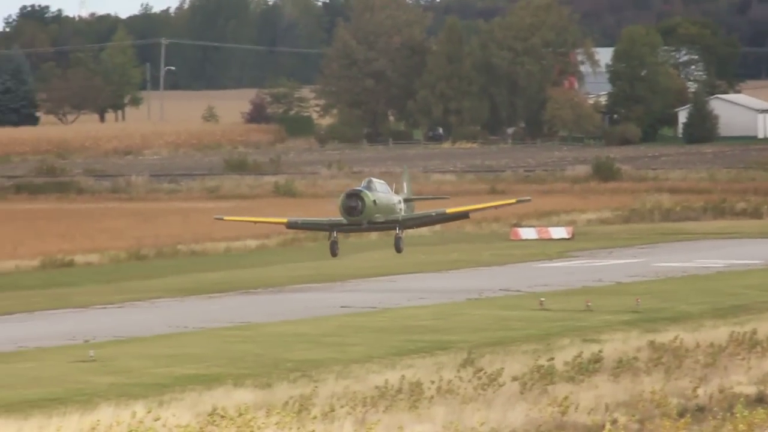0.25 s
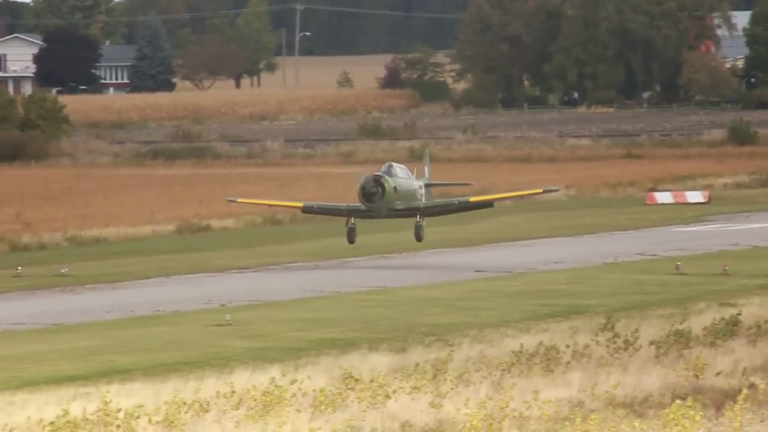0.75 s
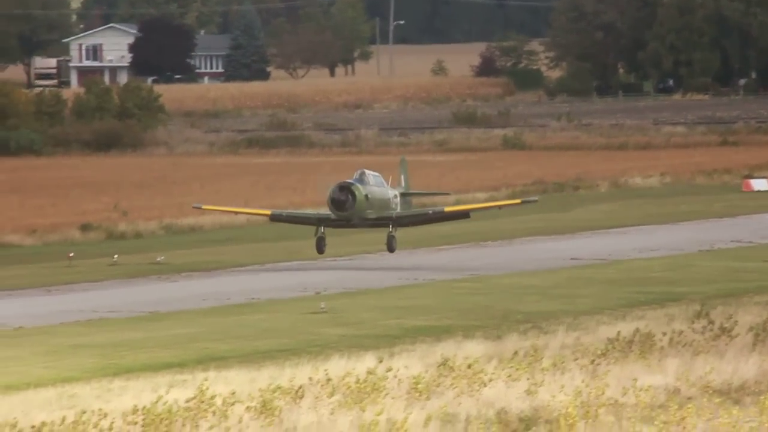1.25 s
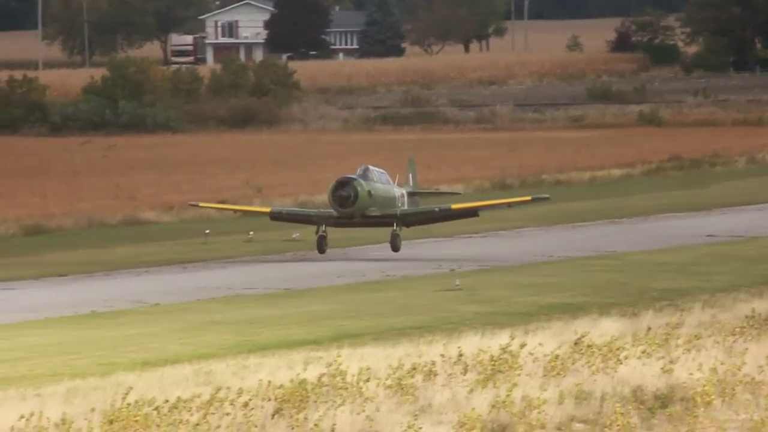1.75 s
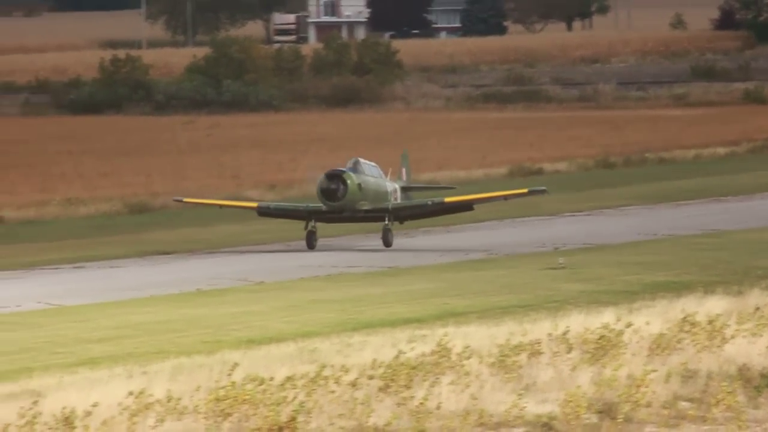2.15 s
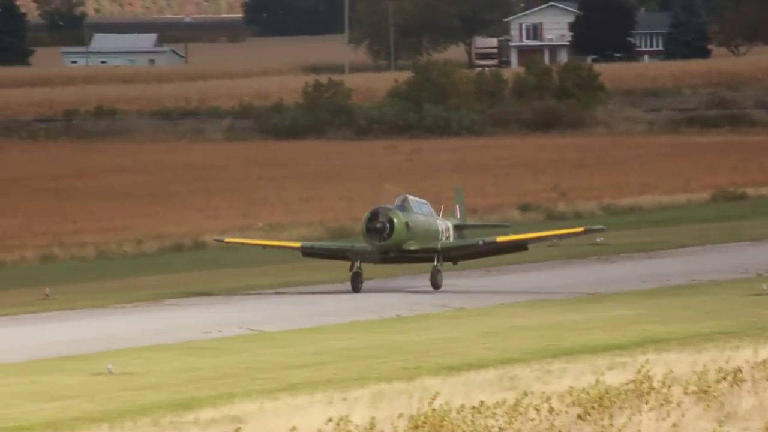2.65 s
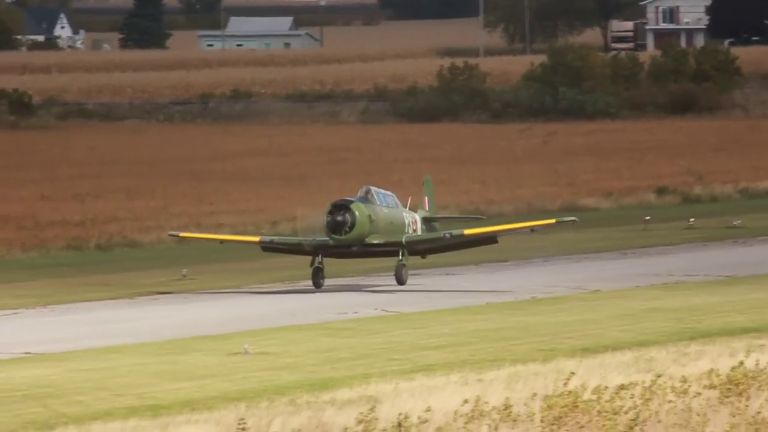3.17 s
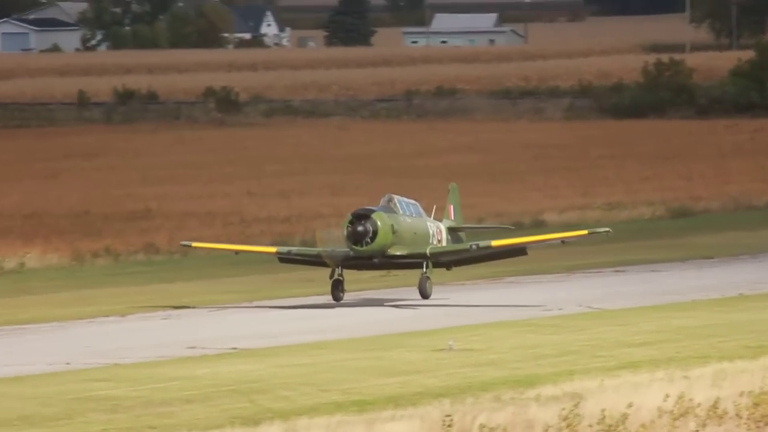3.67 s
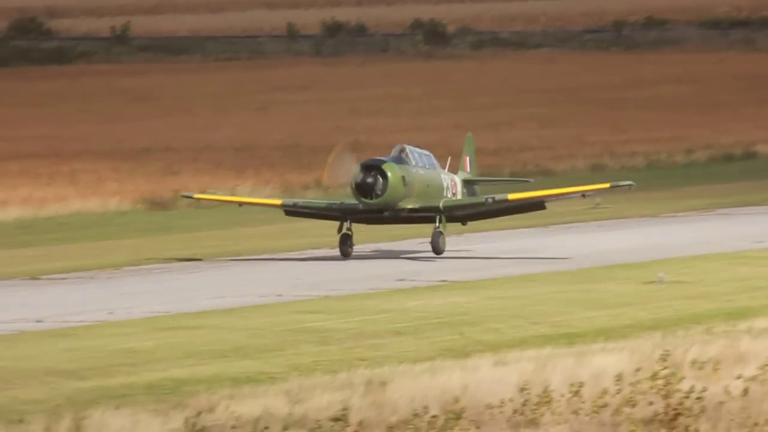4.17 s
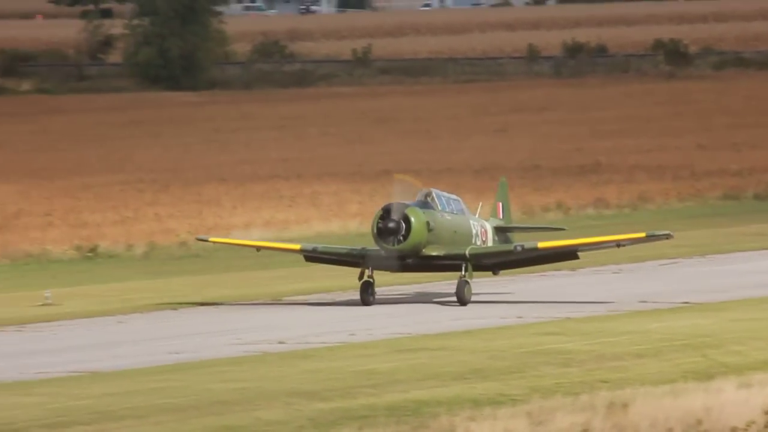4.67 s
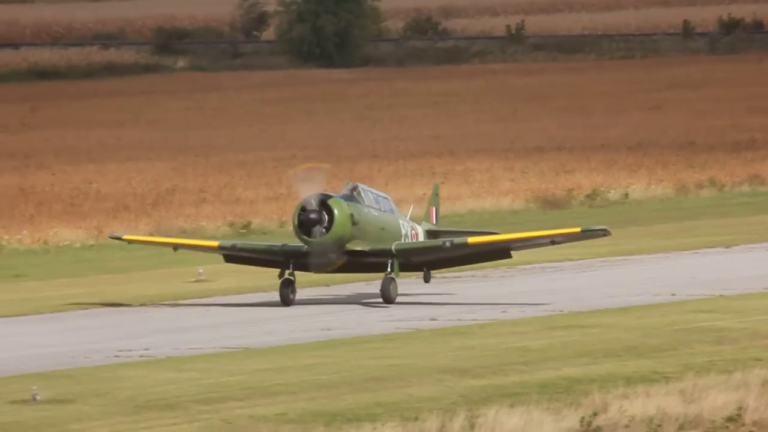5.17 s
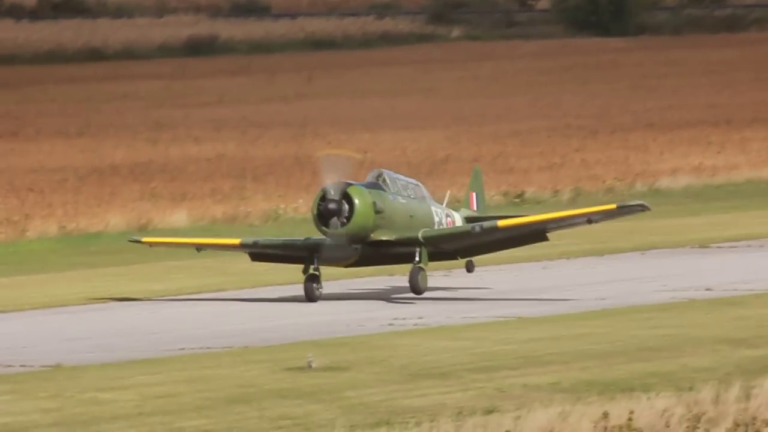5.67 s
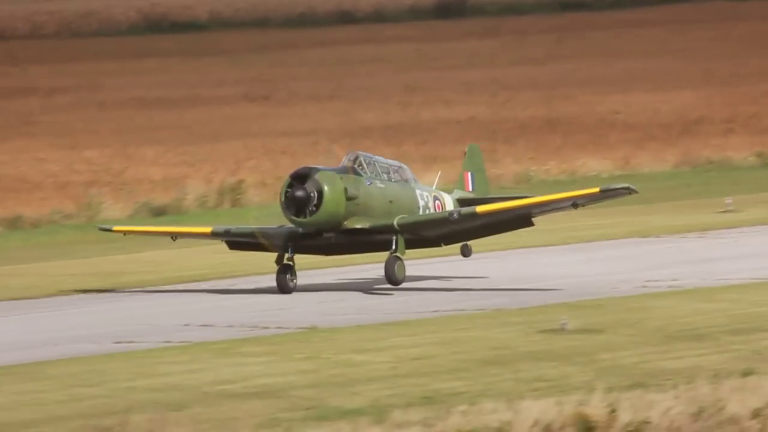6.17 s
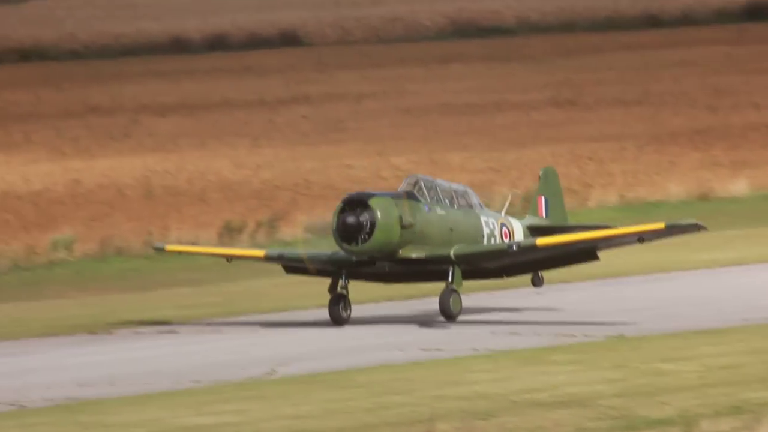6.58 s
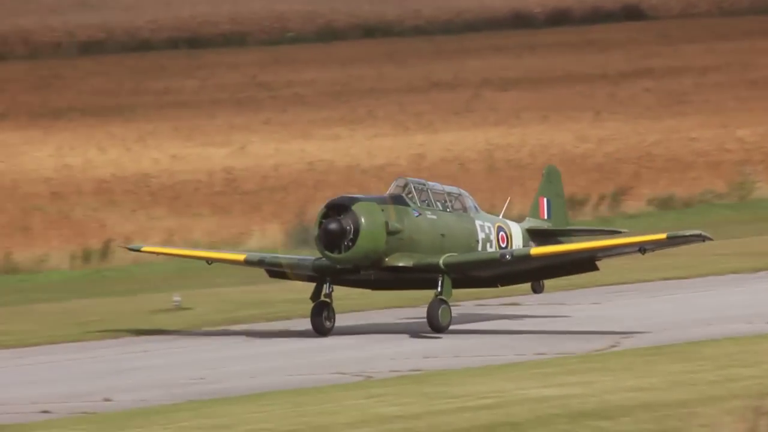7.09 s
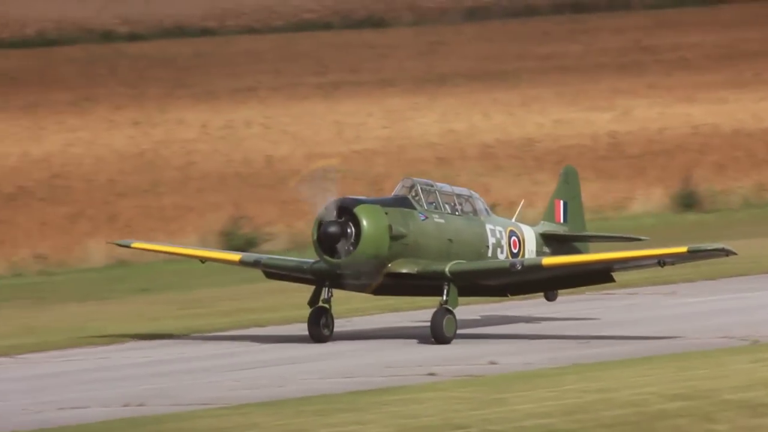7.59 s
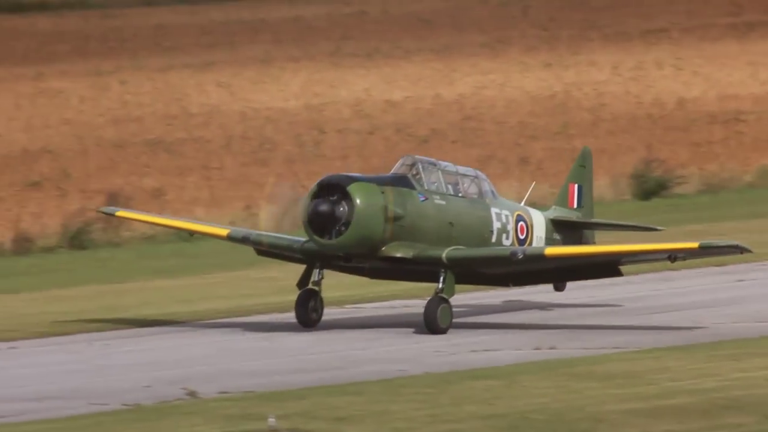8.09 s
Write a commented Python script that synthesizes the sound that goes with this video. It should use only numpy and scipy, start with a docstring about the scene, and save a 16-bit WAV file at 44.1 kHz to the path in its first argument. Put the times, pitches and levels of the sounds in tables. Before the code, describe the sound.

Gusty wind rumbles and thumps hard on an outdoor microphone, nearly burying the low, idling radial engine of a landing propeller plane.

```python
"""A propeller aircraft with a nine-cylinder radial engine lands, throttled back, and rolls out by a dry field:
exhaust pulses and puffs of gas ring the resonances of the exhaust stack.
Broadband noise, probably the aircraft's, swells as a lower rush and an upper hiss; the grass sizzles finely.
Gusty wind buffets the microphone as lumpy rumble; single eddies thump as short swings of pressure with pops.
Four short bright cracks of overload stand out, and a limiter pulls the whole sound down for a while."""
import sys
import numpy as np
from scipy import signal
from scipy.fft import rfft, irfft, next_fast_len
from scipy.io import wavfile
from scipy.ndimage import uniform_filter1d, map_coordinates

SR = 44100
rng = np.random.default_rng(int(sys.argv[2]) if len(sys.argv) > 2 else 0)


def store_wav(level_fs):
    """Save 16-bit WAV to argv[1]."""
    pcm = np.round(np.clip(np.atleast_2d(level_fs), -1, 1) * 32767)
    wavfile.write(sys.argv[1], SR, pcm.T.astype(np.int16))


N = 367794

# spectrum of air tearing off the microphone port, relative: frequency_hz, density_db
POP_SPECTRUM = [(200, -14), (450, 9), (800, 0.5), (1200, -8.5), (2000, -19.5), (3000, -30), (4500, -51.5),
                (10000, -71.5)]


def amp(db):
    """Level to linear amplitude: 20 dB is a factor of ten."""
    return 10 ** (np.asarray(db) / 20)


def unit(x):
    """Normalization to a root-mean-square value of 1."""
    return x / np.sqrt(np.mean(x ** 2) + 1e-20)


def curves(rows):
    """Linear interpolation in time: one value per sample for each column after time_s."""
    times_s, *columns = np.transpose(rows)
    return [np.interp(np.arange(N) / SR, times_s, column) for column in columns]


def filtered(x, response):
    """Linear filtering: the spectrum of x times a response of frequency."""
    length = next_fast_len(N + SR // 2)
    spectrum = rfft(x, length) * response(np.fft.rfftfreq(length, 1 / SR))
    return irfft(spectrum, length)[:N]


def wobble(rate):
    """Low-pass noise of rms 1: a smooth random curve that turns about rate times a second."""
    return unit(filtered(rng.standard_normal(N), lambda hz: 1 / (1 + (2 * hz / rate) ** 6)))


def coloured(x, spectrum):
    """Spectral shaping: x weighted by dB points on a logarithmic frequency axis, at rms 1."""
    points_hz, points_db = np.transpose(spectrum)

    def response(hz):
        return amp(np.interp(np.log(hz + 1), np.log(points_hz), points_db))

    return unit(filtered(x, response))


def patchy_noise(spectrum, patchy_db):
    """Modulated noise of rms 1, its gain varying in patches smooth over time and frequency."""
    cells = signal.stft(rng.standard_normal(N), nperseg=512)[2]
    patches = uniform_filter1d(rng.standard_normal(cells.shape), size=4, axis=0)
    patches = uniform_filter1d(patches, size=16, axis=1)
    noise = signal.istft(cells * amp(patchy_db * unit(patches)), nperseg=512)[1][:N]
    return coloured(noise, spectrum)


def bursts(rows, spectrum, decay):
    """Impulsive noise: each (peak_s, level_db) row is a puff that peaks then and dies away over decay s."""
    envelope = np.zeros(N + SR)
    t = np.arange(SR // 20) / SR
    shape = t / decay * np.exp(1 - t / decay)
    for peak_s, db in rows:
        # the shape peaks one decay after its onset
        envelope[round((peak_s - decay) * SR):][:len(t)] += amp(db) * shape
    noise = coloured(rng.standard_normal(N), spectrum)
    local_rms = np.sqrt(np.abs(uniform_filter1d(noise ** 2, size=200)) + 0.072)
    return envelope[:N] * noise / local_rms / 2


def aircraft(pulse_db=-10, gas_db=-1, scatter_db=2, cylinder_db=0.5):
    """Source and resonator: each firing sends a pulse and a puff of gas through the exhaust stack."""
    # the aircraft's relative loudness: time_s, level_db
    loudness = [(0, -25), (1, -26), (1.5, -32.5), (2.2, -32), (2.7, -39), (3.3, -33.5), (4.6, -27),
                (5.2, -33.5), (5.8, -42.5), (6.5, -36.5), (7.2, -34), (8.34, -44)]
    # engine speed and depth of its throb: time_s, firings_per_s, throb_share (0-1)
    engine_speed = [(0, 96, .8), (.5, 97, .8), (1.5, 95, .7), (3.5, 94, .6), (5, 88, .3), (8.34, 80, .3)]
    # exhaust stack resonances, relative level: centre_hz, width_hz, level_db
    resonances = [(109, 198, 0.5), (297, 99, 3), (520, 154, 0.5), (787, 210, 2.5), (1117, 200, -2.5),
                  (1860, 960, -11), (2950, 240, -22), (3090, 200, -21), (4270, 610, -32.5)]

    rate, throb = curves(engine_speed)
    firings = np.cumsum(rate * (1 + .003 * wobble(7.3))) / SR
    index = firings.astype(int)
    # the nine cylinders differ a little, and so does every single firing
    cylinders = rng.standard_normal(size=9)
    scatter = rng.standard_normal(N)[index]
    strength = amp(cylinder_db * cylinders[index % len(cylinders)] + scatter_db * scatter)
    pulses = throb * strength * np.diff(index, prepend=0)
    puff_shape = .5 + 1.2 * np.exp(-(firings % 1) / 0.46)  # decays over part of a firing period
    puffs = (1 - throb + throb * strength * puff_shape) * rng.standard_normal(N)

    def far_stack(hz):
        response = 0
        for k, (centre, width, db) in enumerate(resonances):
            band = 1j * hz * width
            # neighbouring resonances alternate in sign
            response = response + (-1) ** k * amp(db) * band / (centre * centre - hz * hz + band)
        return response / (1 + (hz / 4700) ** 8)  # the air takes away the treble

    exhaust = amp(pulse_db) * unit(filtered(pulses, far_stack))
    exhaust = exhaust + amp(gas_db) * unit(filtered(puffs, far_stack))
    return amp(curves(loudness)[0] - 1.5 + 0.27 * wobble(3.9)) * exhaust


def swell_levels(calm_rush_db=-59.5, calm_hiss_db=-65, crest_shape=1.15):
    """Incoherent addition: overlapping swells add in power, giving rush and hiss levels in dB."""
    # swells of broadband noise, relative levels: crest_s, rise_s, fall_s, rush_db, hiss_db
    swells = [(.02, 0.2, 0.088, -30.5, -51), (0.301, 0.29, 0.21, -35.5, -68), (.7, 0.23, 0.15, -34, -52),
              (1.28, 0.78, 0.21, -38, -55), (1.87, 0.26, .1, -43.5, -56), (2.22, 0.082, 0.22, -37.5, -57.5),
              (3.52, 0.76, 0.3, -41, -57.5), (3.669, 0.18, 0.14, -32.5, -60.5),
              (4.52, 0.36, 0.12, -34.5, -51.5), (4.871, 0.19, 0.17, -26.5, -44.5),
              (5.199, 0.16, .25, -34.5, -51), (6.9, 0.19, 0.57, -36, -50.5),
              (7.699, 0.21, 0.08, -38.5, -49), (8.17, 0.17, 0.13, -34.5, -46.5)]
    t = np.linspace(0, N / SR, 1000)
    power = amp([[calm_rush_db], [calm_hiss_db]]) ** 2
    for crest, rise, fall, rush_db, hiss_db in swells:
        distance = np.abs((t - crest) / np.where(t < crest, rise, fall))
        shape = np.exp(-distance ** crest_shape)  # exponent 1 is a pointed crest, 2 a round one
        power = power + (amp([[rush_db], [hiss_db]]) * shape) ** 2
    return curves(np.column_stack([t, *(10 * np.log10(power))]))


def swelling_rush(rush_db=4.0, hiss_db=2.5):
    """Broadband noise, probably the aircraft's: a lower rush and a flickering upper hiss swell together."""
    # relative spectra of the lower rush and the upper hiss: frequency_hz, density_db
    rush_spectrum = [(150, -20), (500, 8.5), (900, 4.5), (1600, 2), (2200, -3), (3000, -7), (3700, -15.5),
                     (5000, -28.5), (8000, -42), (16000, -57)]
    hiss_spectrum = [(1200, -28.5), (3000, 0.5), (4500, 0.5), (5600, -3.5), (7000, -10), (9000, -20.5),
                     (12000, -27.5), (16000, -35.5)]

    rush_level, hiss_level = swell_levels()
    flutter = wobble(25)
    rush = amp(rush_level + rush_db + 0.91 * flutter) * patchy_noise(rush_spectrum, patchy_db=2.5)
    flicker_db = 0.46 * flutter + 1.5 * wobble(200)
    hiss = amp(hiss_level + hiss_db + flicker_db) * patchy_noise(hiss_spectrum, patchy_db=2.5)
    return rush + hiss


def grass():
    """High-frequency noise: the fine sizzle of the grass."""
    # relative spectrum of the sizzle: frequency_hz, density_db
    sizzle_spectrum = [(3000, -26), (7000, 9), (10000, 3), (13000, 0), (16000, -14)]
    # level of the sizzle: time_s, level_db
    sizzle_level = [(0, -66), (1.25, -60.5), (1.5, -66.5), (1.9, -63.5), (2.15, -75.5), (3.4, -64.5),
                    (4.85, -65.5), (5.9, -82.5), (6.5, -75.5), (7, -67), (7.4, -75.5), (8.34, -82.5)]
    return amp(curves(sizzle_level)[0]) * patchy_noise(sizzle_spectrum, patchy_db=0.5)


def gust_level(attack_s=.02, release_s=0.018, sag_db_per_s=7, flutter_db=1.1, breeze_db=-26):
    """Wind pressure in dB by its envelope: each gust leaps up, sags and drops away to the breeze."""
    # gusts that strike the microphone, relative level: start_s, length_s, level_db
    gusts = [(0.005, 0.11, -12.5), (0.213, 0.017, -10.5), (0.312, 0.016, -13), (0.372, 0.04, -12),
             (0.499, 0.17, -19), (0.711, 0.049, -17.5), (0.836, .055, -9), (1.048, 0.046, -14.5),
             (1.285, 0.12, -10), (1.395, .16, -15.5), (1.594, 0.28, -16.5), (1.826, .16, -9.5),
             (1.999, 0.47, -12.5), (2.538, .14, -18.5), (2.751, 0.063, -14.5), (2.895, 0.22, -16.5),
             (3.144, 0.23, -15.5), (3.392, 0.22, -17), (3.646, .12, -10), (3.831, 0.1, -12.5),
             (4.251, 0.14, -16.5), (4.553, 0.093, -14), (4.897, 0.027, -13), (4.956, 0.21, -12),
             (5.237, .18, -12.5), (5.511, 0.12, -13.5), (5.695, 0.23, -13), (5.909, .08, -18.5),
             (6.016, .11, -14.5), (6.158, .29, -19.5), (6.547, 0.15, -19.5), (6.708, .18, -15.5),
             (6.948, .54, -13), (7.542, 0.34, -14.5), (7.889, 0.29, -17), (8.174, 0.2, -11)]
    t = np.arange(N) / SR
    pressure = np.full(N, amp(breeze_db))
    for start, length, db in gusts:
        near = (t > start - attack_s) & (t < start + length + 10 * release_s)
        age = t[near] - start
        attack = np.clip(.5 + age / attack_s, 0, 1)  # half way up at the start time
        release = np.exp(-np.maximum(age - length, 0) / release_s)
        gust = amp(db - sag_db_per_s * age) * attack * release
        pressure[near] = np.maximum(pressure[near], gust)
    return 20 * np.log10(pressure) + flutter_db * wobble(24)  # no gust blows evenly


def buffeting(rumble_db=0.77, eddy_db=-9.5, steepening=0.18, splutter_db=-19, splutters_per_s=190):
    """Turbulent pressure in lumps: faster air sheds smaller eddies, higher in pitch and in sharper bursts."""
    # relative spectra of the large and the upper eddies: frequency_hz, density_db
    rumble_spectrum = [(15, -29), (30, -25.5), (60, -9), (100, -1.5), (160, -0.5), (230, -3), (320, -10),
                       (450, -18), (800, -36.5), (2000, -81.5)]
    eddy_spectrum = [(100, -34), (220, -3.5), (350, 1.5), (550, -7), (800, -15), (1200, -23), (2000, -39.5),
                     (4000, -64.5), (10000, -70)]
    # size of the passing eddies, heard in the rumble: time_s, pitch_ratio, upper_eddies_db (relative)
    eddy_size = [(0, .8, 1), (1.25, .8, -2), (2.2, 0.98, 1), (3.4, 1, -5.5), (4.2, 0.87, 2),
                 (4.62, 0.92, 1), (5.1, 1.024, -5), (5.7, 1.17, 3), (6.25, 1.25, -1), (6.55, 0.97, -3),
                 (7.4, 1.03, -3), (8.34, 1.185, 2)]

    gust_db = gust_level()
    pitch, upper_db = curves(eddy_size)
    lumps = wobble(60)
    rumble = coloured(amp(3.3 * lumps) * rng.standard_normal(N), rumble_spectrum)
    # the pattern is carried past at the air's speed
    rumble = map_coordinates(rumble, [np.cumsum(pitch)], mode="mirror")
    # evened out, so that the gusts set the slow level
    rumble /= np.sqrt(np.abs(uniform_filter1d(rumble ** 2, size=2000)) + 0.018)
    eddy_gain = amp(2.46 * lumps + 4.9 * wobble(270))
    eddies = coloured(eddy_gain * rng.standard_normal(N), eddy_spectrum)
    # the crest of a gust is its roughest part
    upper_db = upper_db + steepening * (gust_db - np.percentile(gust_db, 75))
    # the flow keeps tearing off the edge of the port in small separate snaps
    snaps = (rng.random(N) < splutters_per_s / SR) * rng.standard_normal(N) * amp(2 * lumps)
    splutter = amp(splutter_db + 0.95 * upper_db) * coloured(snaps, POP_SPECTRUM)
    return amp(gust_db) * (amp(rumble_db) * rumble + amp(eddy_db + upper_db) * eddies + splutter)


def thumps(level_db=-2, cycles=0.31, ragged=0.16, pop_db=-2.0):
    """Eddy pressure: a crossing eddy is one or two ragged swings, with a pop where the flow tears off."""
    # single strong eddies, relative levels: centre_s, thump_level_db, pitch_hz, pop_level_db
    strong_eddies = [(0.087, 4, 127, -17), (0.217, 5, 144, -4.5), (0.595, -2.5, 245, -25),
                     (0.852, 5, 165, -10.5), (1.123, 3.5, 146, -30), (1.374, 0.5, 148, -22),
                     (1.477, 2.5, 195, -9), (1.7, -12, 363, -10.5), (1.941, -5, 183, -6),
                     (1.965, 7, 200, -2.5), (2.038, -6.5, 323, -5.5), (2.076, 5, 238, -12),
                     (2.206, 3.5, 295, -3.5), (2.359, -5.5, 268, -5.5), (2.388, 5, 208, -6.5),
                     (2.562, -3, 237, -10.5), (2.778, -2, 187, -26), (2.982, -1.5, 179, -30),
                     (3.053, -9, 250, -18.5), (3.274, 0.5, 234, -21), (3.455, 0, 191, -19),
                     (3.746, 4, 250, -3.5), (3.95, -1, 320, -13.5), (4.294, -3.5, 248, -27),
                     (4.593, 1, 380, -13), (4.972, 6, 202.7, -13.5), (5.038, 3.5, 244, -22),
                     (5.265, -4, 237.5, -6.5), (5.31, 4, 168, -5.5), (5.383, 5.5, 347, -9),
                     (5.406, -13, 338, -4.5), (5.523, 2.5, 330, -22), (5.617, 1, 344, -8),
                     (5.705, 6, 353.5, -1.5), (5.743, -13, 278, -3.5), (5.783, 1, 267, -16),
                     (5.888, -4, 303.2, -5.5), (5.964, 0.5, 209, -20), (6.096, -8, 419.5, -5),
                     (6.119, -5, 344, -15), (6.244, -2, 375, -4.5), (6.272, -2, 350, -17.5),
                     (6.338, -3.5, 307, -16.5), (7.117, -7.5, 240.4, -8), (7.282, 4, 185.7, -4),
                     (7.455, -0.5, 199.2, -27), (7.591, 2, 278, -3.5), (7.686, -1.5, 188, -17),
                     (7.816, -1, 330, -11.5), (8.251, -6.5, 280.7, -10.5)]
    out = np.zeros(N + SR)
    t = np.arange(-SR // 40, SR // 40) / SR
    tear = wobble(1200)
    turns = rng.random(len(strong_eddies))  # phase at the centre, in cycles
    for (centre, db, hz, _), turn in zip(strong_eddies, turns):
        at = round(centre * SR)
        raggedness = ragged * np.take(tear, at + np.arange(len(t)), mode="wrap")
        swing = np.cos(2 * np.pi * (hz * t + turn) + raggedness)
        out[at:at + len(t)] += amp(db + level_db) * swing / np.cosh(t * hz / cycles)
    pop_rows = [(centre, db) for centre, _, _, db in strong_eddies]
    pops = bursts(pop_rows, POP_SPECTRUM, decay=0.0024)
    return out[len(t) // 2:][:N] + amp(pop_db) * pops  # each thump is centred on its time


def cracks():
    """Impulsive broadband noise: four short bright cracks of overload."""
    # the cracks, relative level: peak_s, level_db
    crack_peaks = [(1.966, -21.5), (3.746, -20), (5.705, -18.5), (7.589, -24.5)]
    # relative spectrum of a crack: frequency_hz, density_db
    crack_spectrum = [(500, -15.5), (1500, 10.5), (3500, 2), (6000, -8), (10000, -17), (16000, -21.5)]
    return bursts(crack_peaks, crack_spectrum, decay=0.00044)


def scene():
    """Superposition: the aircraft behind the wind."""
    return (aircraft() + swelling_rush() + grass() + buffeting() + thumps() + cracks())[None]


def limited(x, threshold_db=0, recovery_db_per_s=18, slope=.55):
    """Gain control: overloads pull the gain down within milliseconds; it creeps back afterwards."""
    over_db = slope * np.maximum(20 * np.log10(np.abs(x) + 1e-9) - threshold_db, 0)
    ramp = recovery_db_per_s * np.arange(N) / SR
    cut_db = np.maximum.accumulate(over_db + ramp) - ramp
    pole = np.exp(-1 / (0.0013 * SR))  # the 1.3 ms attack is too slow for the first peak
    return x * amp(-signal.lfilter([1 - pole], [1, -pole], cut_db))


def record(dry):
    """Nonlinear saturation: limit, softly clip what gets through, fade the last 3 ms, cut above 16 kHz."""
    x = limited(dry[0])
    x = x / (1 + np.abs(x) ** 8) ** (1 / 8)
    fade = np.minimum(np.arange(N)[::-1] / (.003 * SR), 1)
    return filtered(x * fade, lambda hz: hz < 16000)[None]


dry = scene()
out = record(dry)
store_wav(out)
```